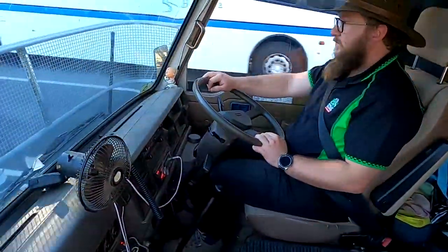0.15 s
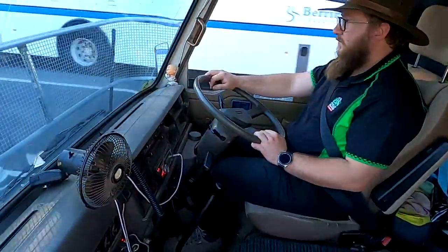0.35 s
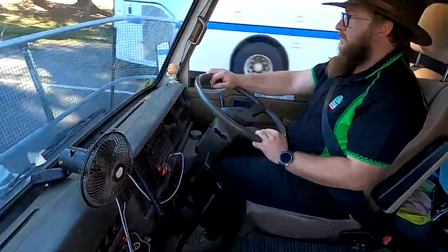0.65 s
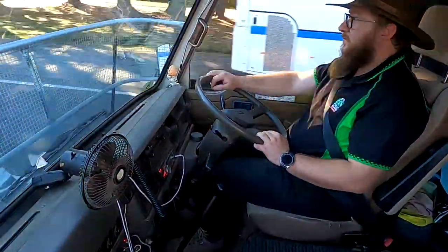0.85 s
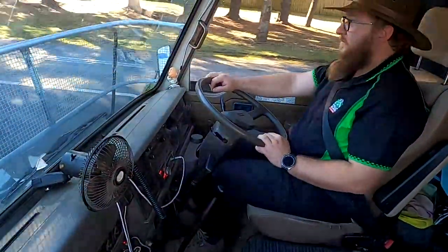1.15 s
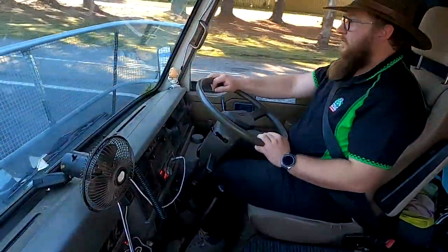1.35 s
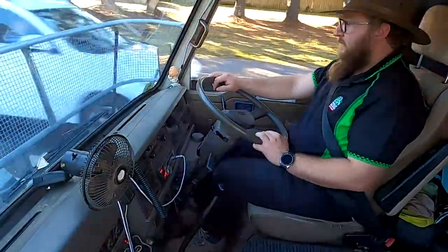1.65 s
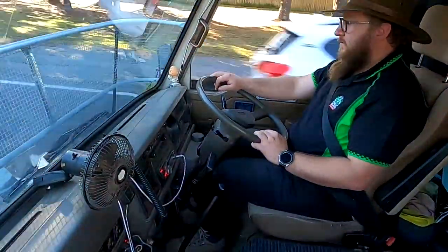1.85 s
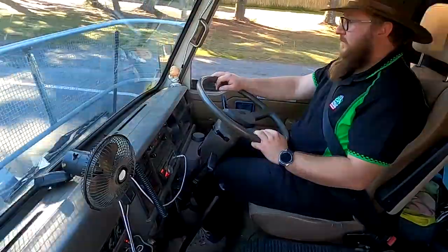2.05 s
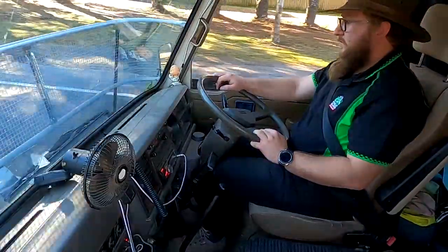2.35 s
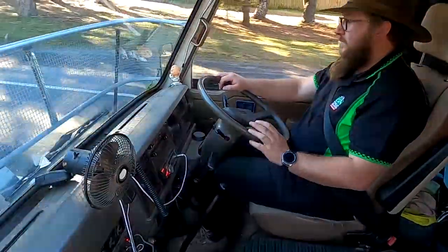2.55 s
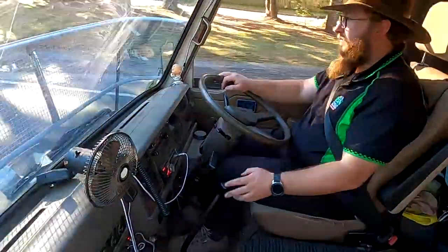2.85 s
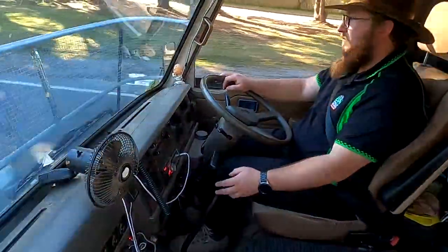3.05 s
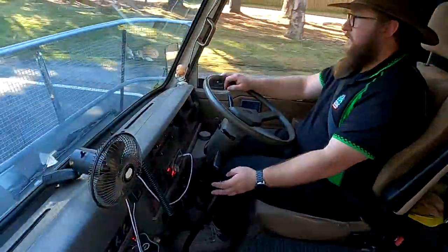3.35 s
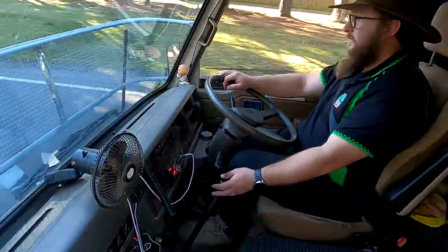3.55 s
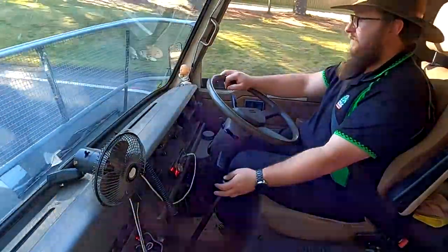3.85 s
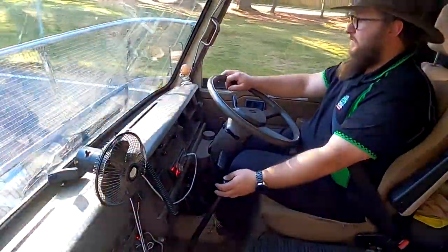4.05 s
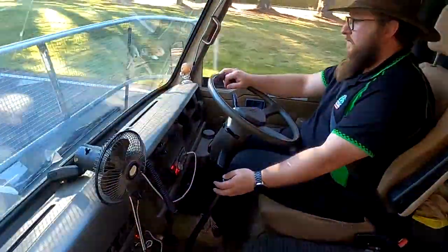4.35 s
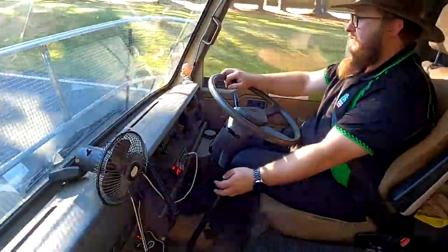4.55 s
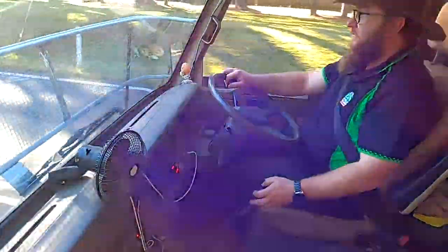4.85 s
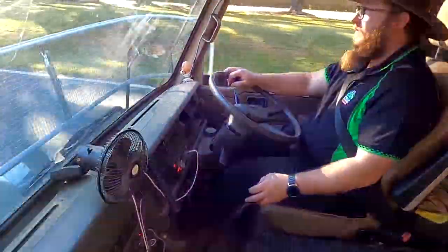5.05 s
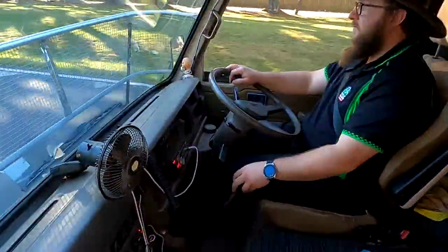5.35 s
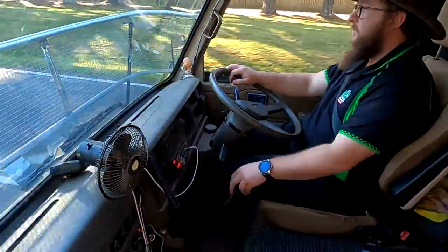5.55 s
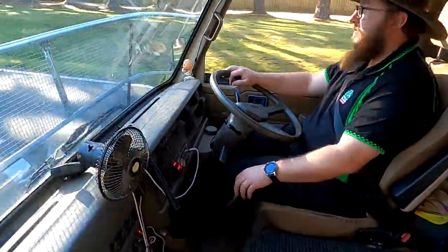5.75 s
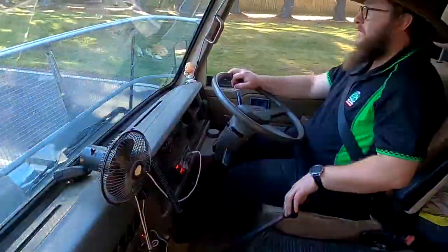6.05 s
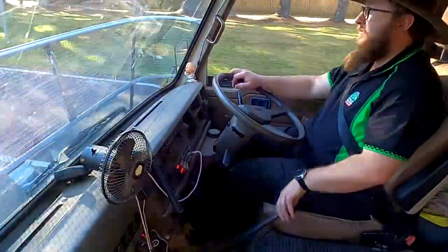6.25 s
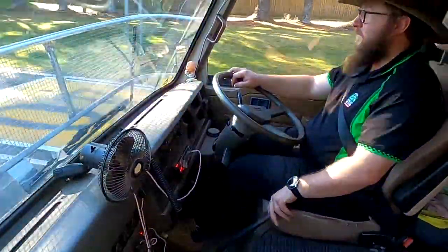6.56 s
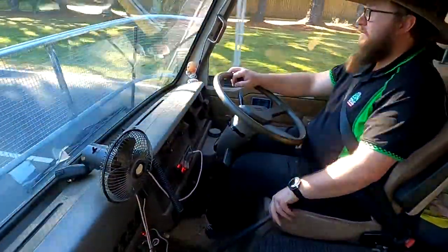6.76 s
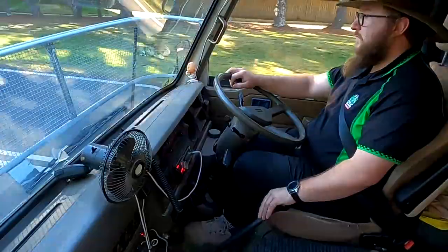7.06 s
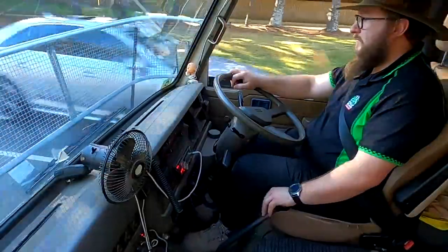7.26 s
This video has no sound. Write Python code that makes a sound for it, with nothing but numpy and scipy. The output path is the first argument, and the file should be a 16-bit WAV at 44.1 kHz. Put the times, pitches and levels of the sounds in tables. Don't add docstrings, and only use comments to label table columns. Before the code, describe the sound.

Heard beside the seat in an old truck cab, a four-cylinder diesel drones and growls with slowly rising revs over low road rumble. After about five seconds the throttle lifts with a dull knock and the pitch slides down. The gear drops in with a solid thunk, the dry clutch pedal chirps, slack thumps closed, and the engine pulls on at a clearly lower pitch, ending with a sharp lever click.

```python
import sys
import numpy as np
from scipy import signal
from scipy.fft import rfft, irfft, next_fast_len
from scipy.io import wavfile
from scipy.ndimage import uniform_filter1d

SR = 44100
rng = np.random.default_rng(int(sys.argv[2]) if len(sys.argv) > 2 else 0)


def invert_db(x):
    u = np.asarray(x, float) / 20
    return 10 ** u


def unload_audio(sound):
    columns = np.transpose(np.atleast_2d(sound))
    steps = np.round(np.clip(columns, -1, 1) * 32767)
    wavfile.write(sys.argv[1], SR, steps.astype(np.int16))


N = 326340
TIME = np.arange(N) / SR
COAST_START_S, COAST_END_S, COAST_RAMP_S, TAKE_UP_S = 5.0, 6.67, .05, 0.56


def level(x, db):
    return x * invert_db(db) / np.sqrt(np.mean(x ** 2))


def colour(x, points):
    hz, db = np.transpose(points)
    size = next_fast_len(N)
    log_hz = np.log(np.maximum(np.arange(size // 2 + 1) * SR / size, 1))
    point_hz = np.r_[hz[0] * .7, hz, hz[-1] * 1.2]
    point_db = np.r_[db[0] - 40, db, db[-1] - 30]
    gain_db = np.interp(log_hz, np.log(point_hz), point_db)
    return level(irfft(rfft(x, size) * invert_db(gain_db), size)[:N], 0)


def ring(x, hz, width_hz):
    return signal.lfilter(*signal.iirpeak(min(hz, .45 * SR), hz / width_hz, SR), x)


def lift(hz, centre_hz, width_hz):
    return np.exp(-(2 * (hz - centre_hz) / width_hz) ** 2 * np.log(2))


def walk(rate):
    steps = np.repeat(rng.standard_normal(int(N / SR * rate) + 2), 8)
    slewed = uniform_filter1d(uniform_filter1d(steps, 8), 8)
    return 1.3 * np.interp(TIME * rate * 8, np.arange(len(steps)), slewed)


def noise():
    return rng.standard_normal(N)


def curves(table):
    s, *columns = np.transpose(table)
    return [np.interp(TIME, s, c) for c in columns]


def burst(t60, rise):
    age = TIME[:SR // 2]
    return rng.standard_normal(len(age)) * (1 - np.exp(-age / rise)) * invert_db(-60 * age / t60)


def add(out, s, db, sound):
    part = out[int(s * SR):][:len(sound)]
    part += (invert_db(db) * sound / np.max(np.abs(sound)))[:len(part)]


# t/s, firing rate f/Hz
ENGINE_SPEED = [(0, 79.4), (.5, 82), (1.7, 86.6), (2.5, 90), (2.9, 91.5), (4.5, 98.4), (4.9, 99.7), (5, 98),
                (5.1, 98), (5.25, 92.2), (5.55, 82.2), (5.85, 73.6), (6.35, 59.6), (6.45, 57.6), (6.53, 57),
                (6.62, 59.5), (7.15, 59.8), (7.4, 60.7)]


def firing_rate():
    return curves(ENGINE_SPEED)[0]


# t/s, combustion effort level/dB, shake through the mounts level/dB
ENGINE_LOAD = [(0, -0.5, -3.5), (.35, 0, -0.4), (1.3, -1, -1.1), (2.05, 0, 0.5), (2.4, -0.2, -1.5),
               (3.4, 1.6, -0.5), (4.3, 2, -0.7), (4.7, 4, 0.2), (4.98, 4, -2.1), (5.02, -3, -7.5),
               (5.13, -1.5, -0.5), (5.35, -2, -5.5), (5.8, -5, -5.5), (6.2, -6, -2.5), (6.44, -8, -7),
               (6.58, -3, -18), (6.82, -2.5, -8), (7.4, -1, -0.5)]


def load():
    return curves(ENGINE_LOAD)


def boom(turns, lines_db, lags):
    out = 0
    for k, (db, lag) in enumerate(zip(lines_db, lags)):
        phase = 2 * np.pi * ((k + 1) * turns - lag) + 0.025 * walk(8.1)
        out = out + np.sqrt(2) * invert_db(db + 0.75 * walk(16)) * np.cos(phase)
    return out


# f/Hz, width f/Hz, level/dB
CAB_MODES = [(53.5, 25, -8.5), (117, 17, -9.5), (139, 18, 5), (168.8, 13, 3.5), (191.1, 22.3, 8.5),
             (246, 4.2, 5), (262.4, 18, 8.5), (288.8, 18.7, 10), (212, 6.9, 6), (355.7, 36, 13),
             (380, 10, -13), (430, 36, 3), (442, 8.1, -5.5), (459, 18, 4.5)]


def cab(hz):
    return sum(db * lift(hz, centre, width) for centre, width, db in CAB_MODES)


# level/dB, change off throttle level/dB, change in the new gear level/dB,
# share of the mount shake [dB per dB]
FIRING_LINES = [(-21, 1.5, 1, 1.04), (-23.5, -2.5, -6, 0.74), (-34, -9.5, 1.5, 0.27), (-40, -12, -3.5, 0.4),
                (-34, -9, -4, 1.1), (-47, -7.5, -10, 0.49), (-50.5, -3.5, 12, .7)]
LINE_PATHS = [3.68, 1.0, 8.99, 4.16, 5.66, 5.66, 5.66]


def firings(turns, hz, shake_db, coast, geared):
    lines_db, lags = [], []
    for k, (db, off_db, gear_db, share) in enumerate(FIRING_LINES):
        drive_db = db + off_db * coast + gear_db * geared + share * shake_db
        loose_db = 2.5 * min(k + .4, 1) * (coast + geared) * walk(16)
        lines_db.append(drive_db + cab((k + 1) * hz) + loose_db)
    for k, metres in enumerate(LINE_PATHS):
        lags.append((k + 1) * hz * metres / 343 + .5 * min(k, 1) * coast)
    return boom(turns, lines_db, lags)


def fan(turns, hz):
    ratio = 1.71
    fan_db = -47 + 15.5 * lift(ratio * hz, 138.3, 22)
    return boom(ratio * turns, [fan_db], [0])


def pulley(turns, growl_db):
    return ring(boom(9.83 * turns, [-55 + growl_db], [0]), 870, 110)


# f/Hz, width f/Hz, level/dB
CAB_PANELS = [(938, 91, 2), (1046, 68, 6), (1208, 110, 3.5), (1395, 170, -5.5), (1730, 24, -5.5),
              (2200, 22, -4), (2690, 580, -7)]


def panels(x):
    return x + sum(invert_db(db + 3.1 * walk(2.7)) * ring(x, hz, width) for hz, width, db in CAB_PANELS)


# f/Hz, level/dB
GROWL_SPECTRUM = [(40, -22.5), (100, -2.5), (250, 1), (400, 0), (520, 1), (650, -10.5), (800, -9.5),
                  (1000, -15.5), (1300, -10.5), (1800, -12), (2500, -21.5), (3500, -23.5), (5000, -34.5)]
# multiple of the firing rate, level/dB
STRONG_LINES = [(2.25, -6), (2.75, 13), (3.25, -5.5), (3.5, 3.5), (3.75, 11), (4.25, 4), (4.5, 4.5),
                (4.75, 8), (5.25, 2), (5.5, -2), (6, 4.5), (6.5, -1), (7, 4.5), (7.75, -1.5), (8, 6.5),
                (9, 4.5), (9.5, 1.5), (9.75, 5.5), (10, 0), (10.25, 7.5), (10.75, 3.5), (11, -2.5),
                (11.25, 6.5), (12, 6), (12.25, -1), (13, 4.5), (14, -1), (16, 3), (18, 4)]


def growl(turns):
    size = 2048
    multiple = np.arange(size // 2 + 1) / 4
    gain = invert_db(3.3 * rng.standard_normal(len(multiple)) - 3.5) * (multiple < 60)
    gain[[0, 4, 8, 12, 16, 20]] = 0
    for k, db in STRONG_LINES:
        gain[round(4 * k)] = invert_db(db)
    out, angle = 0, turns / 4 % 1 * size
    for k in range(3):
        cycle = irfft(gain * np.exp(2j * np.pi * rng.random(len(gain))))
        share = 1 if k == 0 else 0.42 * walk(2.182)
        out = out + share * np.interp(angle, np.arange(size + 1), np.r_[cycle, cycle[0]])
    return level(panels(colour(out, GROWL_SPECTRUM)), 0)


# f/Hz, level/dB per Hz
CLATTER_SPECTRUM = [(320, -29.5), (550, -8), (713, -5.5), (907, -14), (1090, -13.5), (1590, -11.5),
                    (1740, -10.5), (2140, -8.5), (2370, -12.5), (2810, -13.5), (3360, -18), (3790, -16),
                    (6000, -39.5), (7800, -65), (13200, -120)]


def clatter(turns):
    fired = np.floor(turns).astype(int)
    strength = invert_db(1.1 * rng.standard_normal(1000)[fired])
    gate = 1 + 0.12 * strength * np.cos(2 * np.pi * turns)
    return level(panels(colour(noise() * gate, CLATTER_SPECTRUM)), 0)


def tappet(turns, hz):
    cycle = np.floor(turns / 4).astype(int)
    age = (turns - 4 * cycle) / hz
    decay_db = -60 * age / .07
    blow = invert_db(1.5 * rng.standard_normal(200)[cycle] + decay_db) * (1 - np.exp(-age / .0015))
    return level(blow * np.sin(2 * np.pi * 930 * age), 0)


# f/Hz, level/dB per Hz
RUMBLE_SPECTRUM = [(15, -21), (30, -13), (60, -9), (110, -1.5), (180, -0.5), (250, -0.5), (350, -5.5),
                   (450, -3), (600, -15), (900, -47)]


def road(effort_db, coast):
    rumble_db = -31.5 + 0.12 * effort_db + 2.5 * coast + 1.2 * walk(12)
    return invert_db(rumble_db) * colour(noise(), RUMBLE_SPECTRUM)


# f/Hz, level/dB per Hz
HISS_SPECTRUM = [(4000, -6.5), (5000, -4), (7800, -9), (9000, -9.5), (10900, -16.5), (11800, -23),
                 (13000, -27), (14000, -35)]


def intake_hiss(effort_db):
    hiss_db = -62.5 + 1.3 * effort_db + 0.97 * walk(25)
    return invert_db(hiss_db) * colour(noise(), HISS_SPECTRUM)


# t/s, peak level/dB, centre f/Hz, t60/s
LEVER_TICKS = [
    (.5, -58, 8000, .08),
    (.747, -56, 8000, .08),
    (2.21, -57, 6000, .08),
    (4.566, -46, 7000, .1),
    (4.774, -41, 7000, .1),
    (4.855, -51, 8500, .08),
    (5.208, -49, 7300, .14),
    (6.668, -55, 8000, .06),
    (7.108, -55, 5800, .08),
    (7.127, -33, 5600, .1),
]
# f/Hz, level/dB, t60/s (not used: every mode rings 150 Hz wide)
LEVER_MODES = [(4840, -6, .06), (5450, -15.5, .1), (5850, -4.5, .1), (6530, -6.5, .1), (6280, -2, .07),
               (7340, -7, .1), (8500, -17, .1), (9100, -11, .07)]


def ticks():
    out = np.zeros(N)
    for s, db, hz, t60 in LEVER_TICKS:
        blow = ring(ring(burst(t60, .002), hz, 0.6 * hz), hz, 0.99 * hz)
        tint_db = 3.0 * rng.standard_normal(len(LEVER_MODES))
        sound = .5 * blow
        for row, tint in zip(LEVER_MODES, tint_db):
            sound = sound + 4.9 * invert_db(row[1] + tint) * ring(blow, row[0], 150)
        add(out, s, db, sound)
    return out


# t/s, peak level/dB, centre f/Hz, width f/Hz, t60/s
KNOCKS = [
    (1.96, -30.5, 1600, 1800, 0.78),
    (2.056, -25.5, 1900, 1800, 0.091),
    (4.984, -25, 75, 50, 0.2),
    (4.989, -18, 240, 149, 0.19),
    (6.197, -31.5, 1350, 350, 0.09),
    (6.202, -20.5, 480, 200, 0.087),
    (6.205, -13, 200.4, 22, 0.06),
    (6.63, -34, 30, 25, 0.44),
    (6.639, -27, 100, 60, 0.15),
    (6.689, -18, 187, 60, 0.17),
]


def thuds():
    out = np.zeros(N)
    for s, db, hz, width, t60 in KNOCKS:
        blow = burst(t60, 0.051 * t60)
        add(out, s, db, ring(ring(blow, hz, width), hz, 2 * width))
    return signal.sosfilt(signal.butter(2, 4000, fs=SR, output="sos"), out)


# t/s, length t/s, first pitch f/Hz, last pitch f/Hz, level/dB
PEDAL_SQUEAKS = [(5.02, .01, 4470, 4420, -45), (5.046, .008, 4350, 4340, -51),
                 (5.066, .01, 4325, 4320, -50), (6.362, .026, 6720, 6840, -55),
                 (6.39, .012, 6880, 6910, -44), (6.408, .026, 6920, 6915, -34),
                 (6.458, .024, 6910, 6850, -38), (6.476, .016, 6405, 6355, -58),
                 (6.494, .045, 6860, 6845, -62), (6.606, .02, 5185, 5140, -45),
                 (6.756, .036, 5205, 5225, -51), (6.798, .03, 5240, 5390, -60),
                 (6.836, .035, 5420, 5450, -51), (6.85, .024, 5800, 5990, -52),
                 (6.886, .052, 6965, 6995, -37), (6.944, .032, 6940, 7055, -38),
                 (6.978, .04, 7058, 6990, -37), (7.022, .02, 6950, 6800, -46),
                 (7.048, .03, 6850, 6910, -60)]


def squeaks():
    catch_db_per_s, slip_db_per_s = 1998, 1601
    out = np.zeros(N)
    for s, length, first_hz, last_hz, top_db in PEDAL_SQUEAKS:
        hz = np.interp(TIME, [s, s + length], [first_hz, last_hz])
        db = top_db - catch_db_per_s * np.maximum(s - TIME, 0)
        db = db - slip_db_per_s * np.maximum(TIME - s - length, 0)
        wobble = .002 + .0005 * max(-38 - top_db, 0)
        phase = 2 * np.pi * np.cumsum(hz * (1 + wobble * walk(300))) / SR
        note = np.sin(phase) + invert_db(-44.0) * np.sin(2 * phase)
        out += np.sqrt(2) * invert_db(db - 1.5 + 2 * walk(200)) * note
    return out


def scene():
    hz = firing_rate()
    turns = np.cumsum(hz) / SR
    effort_db, shake_db = load()
    lifted = (TIME - COAST_START_S) / COAST_RAMP_S
    biting = (COAST_END_S - TIME) / TAKE_UP_S
    coast = np.clip(np.minimum(lifted, biting), 0, 1)
    geared = np.clip(1 - biting, 0, 1)

    growl_db = .3 * effort_db - 6 * coast
    clatter_db = -40.5 + 1.04 * effort_db + coast
    knock_db = -50 + 2 * growl_db + 4.5 * lift(hz, 90.6, 5)

    engine = firings(turns, hz, shake_db, coast, geared) + fan(turns, hz) + pulley(turns, growl_db)
    engine += invert_db(-34 + growl_db) * growl(turns)
    engine += invert_db(clatter_db) * clatter(turns)
    engine += invert_db(knock_db) * tappet(turns, hz)
    controls = ticks() + thuds() + squeaks()
    return (engine + road(effort_db, coast) + intake_hiss(effort_db) + controls)[None]


def top_cut(x):
    return signal.sosfilt(signal.butter(12, 14250, fs=SR, output="sos"), x)


def record(dry):
    return top_cut(dry)


dry = scene()
out = record(dry)
unload_audio(out)
```